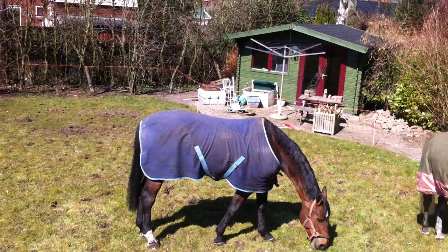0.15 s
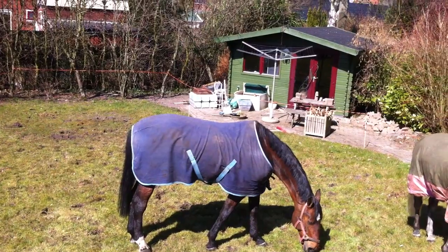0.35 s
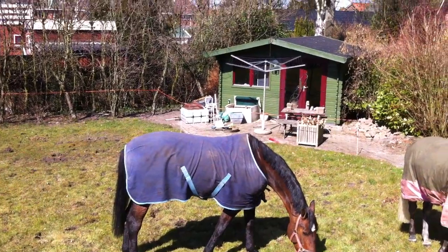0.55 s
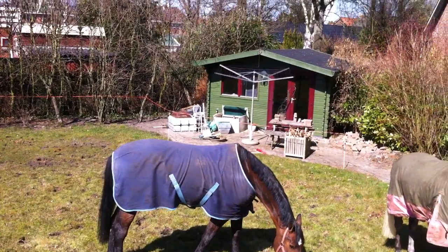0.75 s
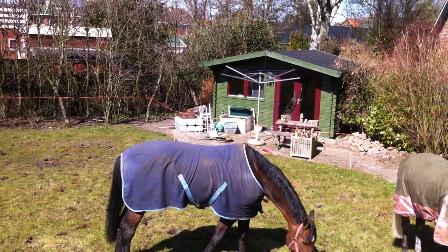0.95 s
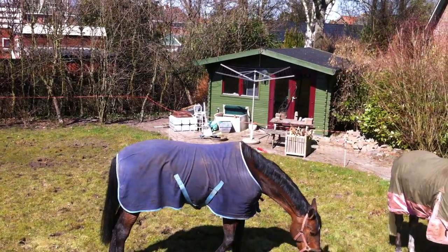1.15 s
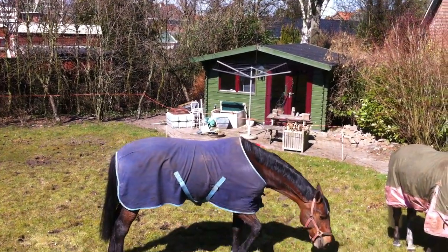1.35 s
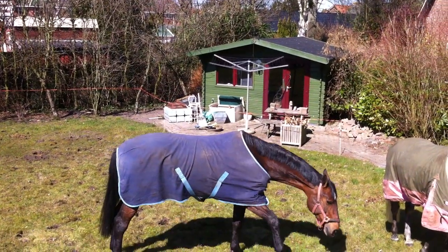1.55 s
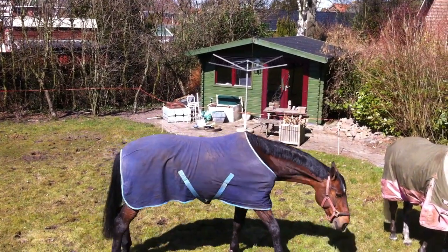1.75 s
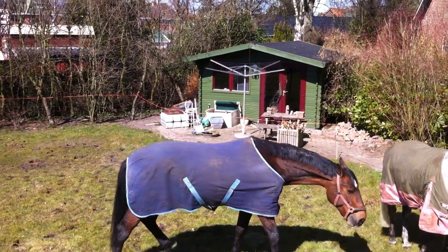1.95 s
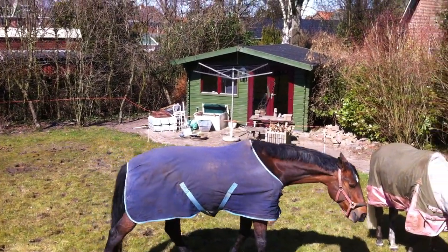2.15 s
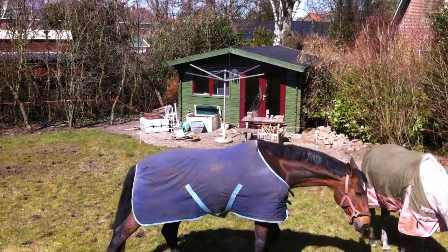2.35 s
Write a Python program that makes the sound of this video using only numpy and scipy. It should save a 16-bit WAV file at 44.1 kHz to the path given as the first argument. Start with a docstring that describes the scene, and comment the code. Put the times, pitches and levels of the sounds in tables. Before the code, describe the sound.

A horse snort in an open garden paddock: a soft draw of air around 0.4 s, then from 0.8 s a breathy, wet blow fluttering at over twenty flaps a second, strongest near 0.9-1.1 s, fading by 1.5 s. A faint breath follows near 1.8 s. Low wind thumps and rumbles hit the microphone, densest early, with a hard knock near 0.95 s. Faint hush and tiny grass rustles.

```python
"""Wind knocks and rumbles on the microphone in short gusts, over a faint outdoor hush in a garden paddock.
A grazing horse softly draws air, then blows out through fluttering nostrils; the snort swells and dies away.
The gusts, breath and hush are noise shaped by frequency, and each flap of the nostrils pulses the snort.
The wind's thumps are short sagging tones, a faint hum joins the snort, and brief noise bursts rustle the grass."""
import sys
import numpy as np
from scipy import signal
from scipy.fft import rfft, irfft
from scipy.io import wavfile

SR = 44100
rng = np.random.default_rng(int(sys.argv[2]) if len(sys.argv) > 2 else 0)


def to_wav(sig):
    """Store sig (one row per channel, or 1-D mono) as 16-bit WAV at the path in sys.argv[1].

    Samples outside -1..1 are clipped; the rate is SR.
    """
    pcm = np.clip(np.atleast_2d(sig), -1, 1) * 32767
    pcm = np.round(pcm).astype(np.int16)
    wavfile.write(sys.argv[1], SR, pcm.T)  # frames by channels


N = 110117
T = np.arange(N) / SR  # time in seconds
FREQS = np.maximum(np.fft.rfftfreq(N, 1 / SR), 1)  # Hz, kept above zero for the logarithms and divisions


def undb(db):
    """Turn decibels into a gain."""
    return 10 ** (np.asarray(db) / 20)


def curve(rows):
    """Join (time in s, value) rows with straight lines."""
    times, values = np.array(rows).T
    return np.interp(T, times, values)


def noise(gain):
    """Make noise of rms 1, shaped by a gain at each frequency."""
    spectrum = rfft(rng.standard_normal(N)) * gain
    shaped = irfft(spectrum, N)
    return shaped / np.std(shaped)


def colour(points):
    """Turn (Hz, dB) points into a gain at each frequency."""
    hz, db = np.array(points).T
    return undb(np.interp(np.log(FREQS), np.log(hz), db))


def resonance(hz, width_hz):
    """Gain of a steep resonance, strongest at its centre."""
    return 1 / (1 + ((FREQS ** 2 - hz ** 2) / (FREQS * width_hz)) ** 2)


def walk(rate_hz):
    """Random wandering with a spread of 1, mostly slower than the given rate."""
    return noise(1 / (1 + (FREQS / rate_hz) ** 4))


def swell(at_s, half_s):
    """A smooth rise and fall, peaking at 1."""
    return np.exp(-((T - at_s) / half_s) ** 2)


def cut(sound, hz, kind, order):
    """Low-pass or high-pass filter."""
    sos = signal.butter(order, hz, kind, fs=SR, output="sos")
    return signal.sosfilt(sos, sound)


def hush():
    """Distant outdoor air: steady coloured noise that wavers a little in level."""
    # tint of the outdoor air: pitch [Hz], relative level [dB per Hz]
    hush_tint = [(18, -58), (30, -26), (69, -17), (92, -4), (140, -0.5), (160, -17), (177, -0.5), (197, -3),
                 (263, -8), (341, -3.5), (420, -12), (455, -11.5), (656, -14.5), (1020, -12), (1140, -15),
                 (1290, -17.5), (2180, -25), (2690, -27.5), (15500, -35.5)]
    level_db = -57.5 + 0.23 * walk(2.5)
    return noise(colour(hush_tint)) * undb(level_db)


def rustles():
    """Rustling grass: short, bright swishes of noise with a grainy level."""
    # rustles in the grass: start_s [s], attack_s [s], length_s from the start [s], level_db [dB],
    # release_s [s], low_hz [Hz], high_hz [Hz]
    rustle_rows = [(.095, .008, 0.013, -60.5, .003, 5020, 6050),
                   (1.264, 0.0011, 0.0035, -64.5, .004, 1200, 4000),
                   (1.301, 0.00079, 0.0043, -55, 0.0045, 980, 10300),
                   (1.33, .01, 0.057, -74, .02, 4000, 14000),
                   (1.771, .0005, 0.00092, -55.5, 0.0013, 3300, 8900),
                   (1.756, 0.036, 0.072, -61.5, 0.025, 3400, 16900),
                   (2.306, 0.017, 0.19, -78, .03, 4000, 16000)]
    grain_db, grain_rate_hz = 3, 370
    out = 0
    for start_s, attack_s, length_s, level_db, release_s, low_hz, high_hz in rustle_rows:
        rise = np.clip((T - start_s) / attack_s, 0, 1)
        fall = np.exp(-np.maximum(T - start_s - length_s, 0) / release_s)
        grains = rng.standard_normal(N) * undb(grain_db * walk(grain_rate_hz))
        grains = cut(grains, low_hz, "high", order=2)
        grains = cut(grains, high_hz, "low", order=2)
        out = out + undb(level_db) * rise * fall * grains / np.std(grains)
    return out


def gusts():
    """Turbulent wind rumbles on the microphone: low noise, kept above the microphone's low cut."""
    # gusts: peak_s [s], half_s half length [s], level_db [dB], edge_hz upper edge [Hz]
    gust_rows = [(0.016, 0.034, -38, 410), (0.058, 0.02, -33.5, 319), (0.124, 0.016, -43.5, 247),
                 (0.17, 0.032, -34.5, 333), (.176, 0.014, -38, 740), (0.207, 0.019, -41.5, 295),
                 (0.23, 0.034, -40.5, 352), (0.3, 0.014, -39, 325), (.37, 0.036, -38, 240),
                 (0.452, .018, -35.5, 235.5), (0.504, .02, -48.5, 240), (0.646, 0.015, -38, 312),
                 (0.678, 0.033, -46, 208), (0.771, 0.013, -41, 281), (0.819, 0.039, -44, 209),
                 (0.935, 0.024, -42.5, 222), (1.217, 0.037, -46, 230), (1.284, 0.01, -45, 184),
                 (1.366, 0.012, -46.5, 192), (1.432, 0.018, -46, 169), (1.862, 0.032, -51.5, 184),
                 (1.975, .02, -51.5, 224), (2.495, 0.058, -50.5, 226)]
    low_cut_hz, slope = 94, 4.94  # above the edge, gain falls as frequency to this power
    out = 0
    for peak_s, half_s, level_db, edge_hz in gust_rows:
        below = 1 + (low_cut_hz / FREQS) ** 8
        above = 1 + (FREQS / edge_hz) ** (2 * slope)
        rumble = noise(1 / np.sqrt(below * above))
        out = out + rumble * swell(peak_s, half_s) * undb(level_db)
    return out


def eddies():
    """Single eddies hit the microphone: rounded thumps that sag in pitch, most with a brief brighter edge."""
    # eddies: centre_s [s], level_db before the low cut [dB], pitch_hz at the centre [Hz], edge strength [0-1]
    eddy_rows = [(.005, -26, 165, 0.66), (.025, -34, 442, 0), (0.049, -32, 300, 0.1),
                 (0.1449, -16, 157, 0.75), (.160, -31.5, 305, 0.9), (0.1811, -19, 418, 0.11),
                 (.244, -29.5, 296, 0.12), (.280, -29.5, 197, 0), (.303, -25.5, 238, 0.39),
                 (.379, -30, 157, 0.1), (0.415, -30, 148, 0.1), (.453, -27, 153, 0.05),
                 (0.641, -29, 221, 0), (.775, -30, 147, 0.4), (0.9544, -16, 215, 0.18),
                 (1.086, -29, 148, 0.4), (1.18, -34, 149, 0.22), (1.997, -34.5, 151, 0.06),
                 (2.19, -39.5, 130, 0.2)]
    rise_cycles, fall_cycles, edge_cycles = 0.4, 0.55, 0.4
    sag, low_cut_hz = 0.22, 129
    turns = rng.random(len(eddy_rows))  # each thump begins at a random point in its cycle
    out = 0
    for (centre_s, level_db, pitch_hz, edge), turn in zip(eddy_rows, turns):
        cycles = np.clip((T - centre_s) * pitch_hz, -12, 12)  # limited so cosh stays in range
        envelope = 1 / np.cosh(cycles / np.where(cycles < 0, rise_cycles, fall_cycles))
        # the bend makes the pitch start above pitch_hz and end below it
        phase = 2 * np.pi * (cycles - sag * np.hypot(cycles, .5) + turn)
        bright = edge * np.sin(2 * phase) / np.cosh(2 * cycles / edge_cycles)
        out = out + undb(level_db) * envelope * (np.sin(phase) + bright)
    return cut(out, low_cut_hz, "high", order=3)


def hum():
    """A faint hum, wavering in pitch and level, that swells and fades with the snort."""
    pitch_hz = 358 + 12.93 / 2 * walk(16)
    phase = np.cumsum(pitch_hz) / SR
    tone = np.sqrt(2) * np.sin(2 * np.pi * phase)  # rms 1
    level_db = -59 + 2 * walk(5)
    return tone * swell(at_s=0.98, half_s=0.28) * undb(level_db)


def draws():
    """The horse draws air softly before and after the snort: swells of noise around one pitch each."""
    # draws of air: peak_s [s], half_s half length [s], level_db [dB], centre_hz [Hz], width_hz [Hz]
    draw_rows = [(0.36, 0.19, -68.5, 2540, 1500), (0.45, 0.22, -73.5, 4260, 1100),
                 (0.37, 0.15, -60, 700, 650), (1.715, 0.019, -66.5, 4100, 450),
                 (1.785, 0.11, -68, 3250, 1200)]
    out = 0
    for peak_s, half_s, level_db, centre_hz, width_hz in draw_rows:
        breath = noise(resonance(centre_hz, width_hz))
        out = out + breath * swell(peak_s, half_s) * undb(level_db)
    return out


def nostril_opening():
    """The nostrils flap open and shut: one rounded pulse per flap, with uneven strength."""
    # flutter: time_s [s], rate [flaps per second]
    flutter_rows = [(.81, 31.6), (.9, 23.7), (.98, 23.2), (1.04, 22), (1.15, 22), (1.25, 26.3),
                    (1.33, 22.5)]
    first_flap_s, sharpness = .81, 2.6
    phase = np.cumsum(curve(flutter_rows)) / SR
    phase -= np.interp(first_flap_s, T, phase)  # fully open at the first flap
    pulses = np.abs(np.cos(np.pi * phase)) ** (2 * sharpness)
    scatter_db = .5 * walk(6.7)
    return pulses * undb(scatter_db)


def leaky_flow(opening, leak):
    """Air let through by the flaps; a share of it leaks even when they are shut."""
    return leak + (1 - leak) * opening


def ring(modes):
    """Noise of rms 1 ringing in several resonances at once."""
    power = sum((undb(db) * resonance(hz, width_hz)) ** 2 for hz, width_hz, db in modes)
    return noise(np.sqrt(power))


def snort():
    """Each flap lets out a puff that rings nostrils and nose; a fine, wet spray joins at the height of the blow."""
    # force of the outblow before the flutter: time_s [s], level_db [dB]
    blow_rows = [(.775, -70), (.805, -59.5), (.84, -57), (.925, -54.5), (1.0, -59), (1.055, -57.5),
                 (1.095, -64), (1.27, -67), (1.44, -69.5), (1.55, -85)]
    # nostril resonances: pitch_hz [Hz], width_hz [Hz], relative level_db [dB]
    nostril_modes = [(2120, 310, -1), (2600, 900, -3), (3330, 290, -7.5), (3950, 330, -12.5),
                     (4610, 270, -8.5), (5850, 630, -12.5)]
    # nose resonances: pitch_hz [Hz], width_hz [Hz], relative level_db [dB]
    nose_modes = [(540, 560, -5.5), (850, 400, -2.5), (1037, 150, -2)]
    # tint of the wet spray: pitch_hz [Hz], relative level_db [dB]
    spray_tint = [(3000, -29), (5000, -4.5), (6800, -3), (9000, -11), (15000, -9.5)]
    nostril_leak, nose_leak = .32, 0.37  # share of the flow
    nose_db, nose_lag_s = 4, 0.043
    spray_db, spray_peak_s, spray_half_s = -63.5, 0.99, 0.14

    opening = nostril_opening()
    nostril_flow = leaky_flow(opening, nostril_leak)
    force = undb(curve(blow_rows))
    nostrils = ring(nostril_modes) * force * nostril_flow

    late_force = np.interp(T - nose_lag_s, T, force)  # the nose swells a little later
    nose = ring(nose_modes) * late_force * leaky_flow(opening, nose_leak) * undb(nose_db)

    spray = noise(colour(spray_tint)) * swell(spray_peak_s, spray_half_s)
    spray = spray * nostril_flow * undb(spray_db)
    wet_grain = undb(2.2 * walk(270))  # quick, rough changes in level
    return (nostrils + spray) * wet_grain + nose


def scene():
    """Garden, wind and horse added together at one microphone."""
    background = hush() + rustles()
    wind = gusts() + eddies()
    horse = hum() + draws() + snort()
    return (background + wind + horse)[None]  # one channel


def record(dry):
    """The recorder steeply cuts everything above its top frequency."""
    top_hz = 15850
    # 0.2 dB of ripple below the top, at least 70 dB of cut beyond the steep edge
    sos = signal.ellip(10, .2, 70, top_hz, fs=SR, output="sos")
    return signal.sosfilt(sos, dry)


dry = scene()
out = record(dry)
to_wav(out)
```